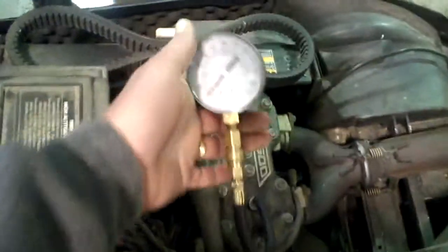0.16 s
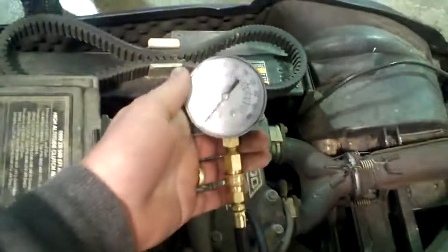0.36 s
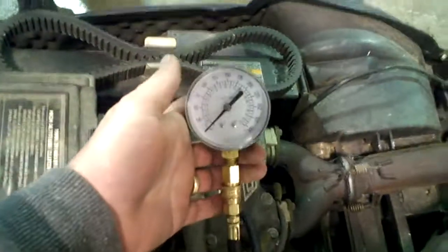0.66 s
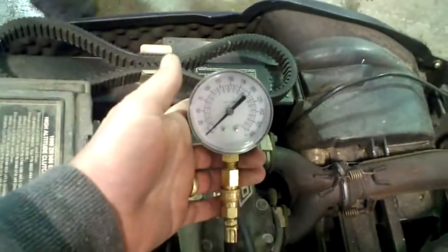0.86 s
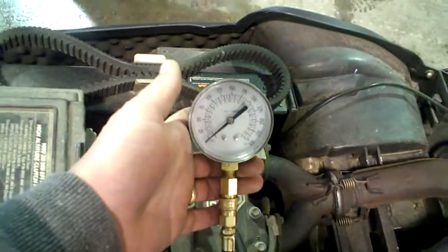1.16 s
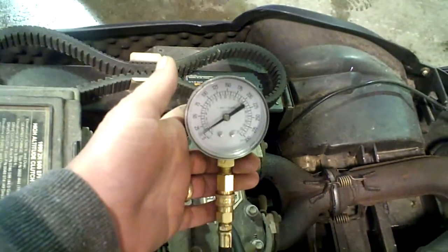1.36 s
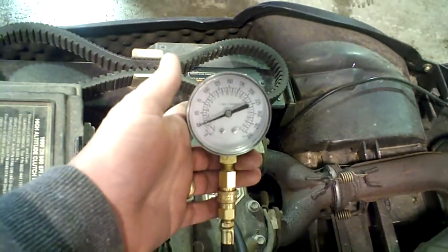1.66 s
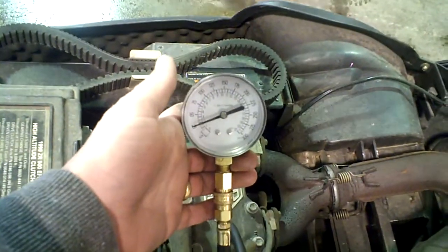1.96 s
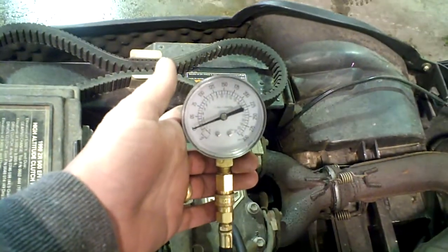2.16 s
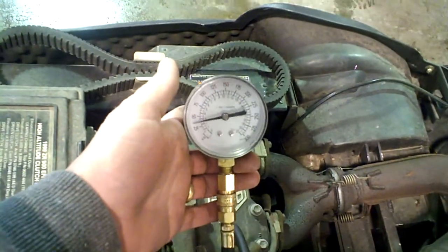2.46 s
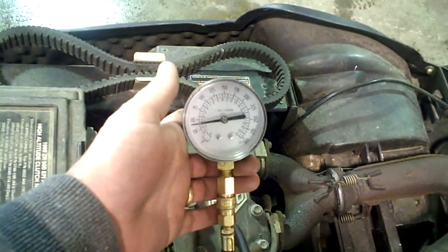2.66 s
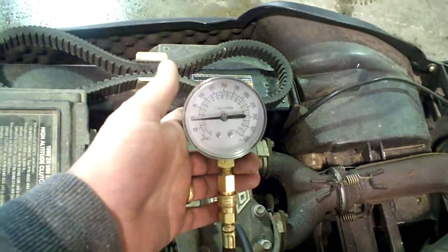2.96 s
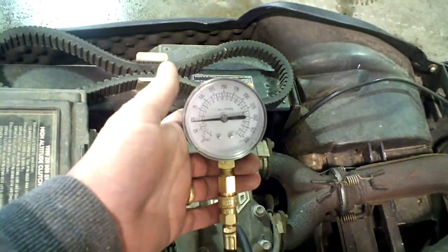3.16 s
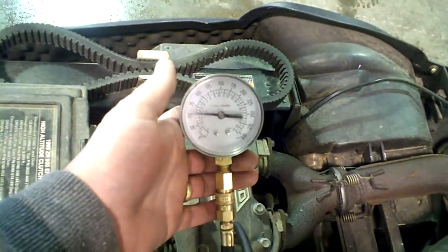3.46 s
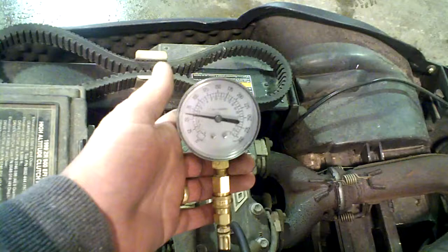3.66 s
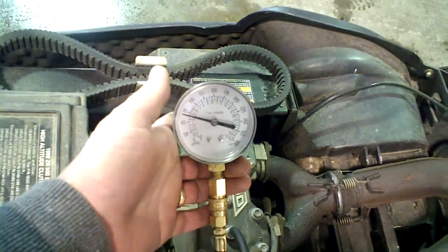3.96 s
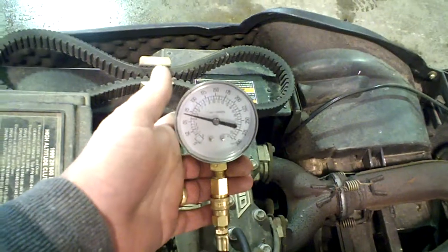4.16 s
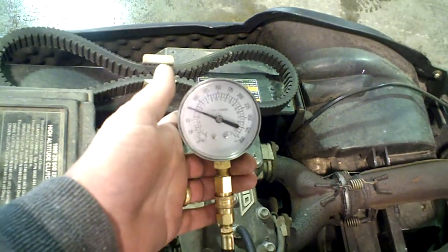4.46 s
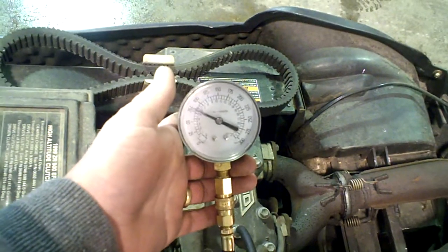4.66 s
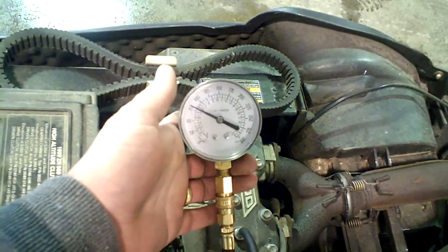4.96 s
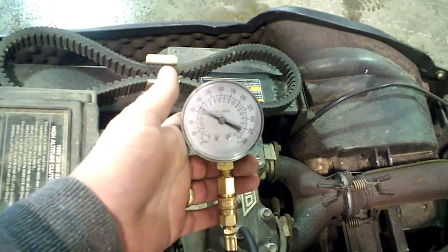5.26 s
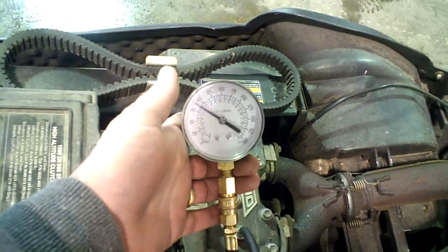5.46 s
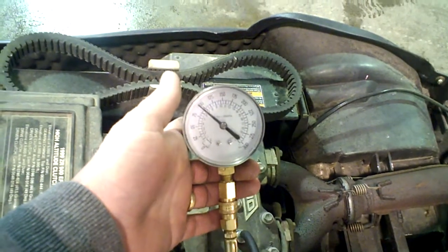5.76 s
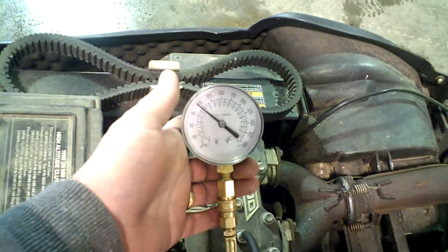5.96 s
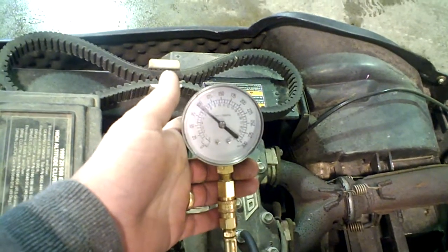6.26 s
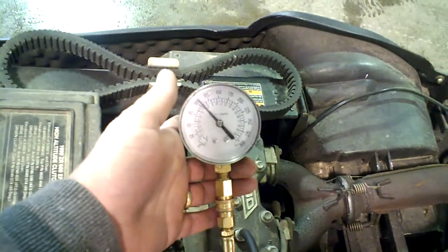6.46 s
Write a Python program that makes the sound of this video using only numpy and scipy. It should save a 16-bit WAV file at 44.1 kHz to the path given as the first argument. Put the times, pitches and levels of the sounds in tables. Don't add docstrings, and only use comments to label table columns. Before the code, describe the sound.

Six short starter pulls about a second apart, each a clunk, rapid airy pops slowing down and a metallic click, in a workshop.

```python
import sys
import numpy as np
from scipy import signal
from scipy.io import wavfile
from scipy.ndimage import uniform_filter1d

SR = 44100
rng = np.random.default_rng(int(sys.argv[2]) if len(sys.argv) > 2 else 0)


def pcm_store(signal):
    levels = np.round(np.clip(np.atleast_2d(signal), -1, 1) * 32767)
    wavfile.write(sys.argv[1], SR, levels.astype(np.int16).T)


def boost(x):
    u = np.asarray(x, float) / 20
    return 10 ** u


N = 291456
T = np.arange(N) / SR

# cord taut in seconds, strength in dB, first pop in dB, suddenness of start [ratio].
PULLS = [
    (1.14, 1.2, -9, 2.3),
    (2.27, 0.86, -11, 1.1),
    (3.31, -0.14, -27.5, 1.03),
    (4.34, -0.45, -22, 0.98),
    (5.35, -0.5, -18.5, 1.05),
    (6.36, -0.5, -17.5, 1),
]
TIGHT_POP_TIMES = [(1.231, 1.3127, 1.3922, 1.4853, 1.6068), (2.3041, 2.3863, 2.4669, 2.5623, 2.689),
                   (3.3053, 3.3963, 3.4776, 3.5713, 3.6961), (4.3303, 4.4217, 4.5049, 4.603, 4.7389),
                   (5.3545, 5.4441, 5.5257, 5.6209, 5.7491), (6.3639, 6.4534, 6.5341, 6.629, 6.757)]
# first pop in seconds, last pop in seconds.
OTHER_POP_SPANS = [(1.1813, 1.6868), (2.2541, 2.7724), (3.2555, 3.7807), (4.2862, 4.8336), (5.2951, 5.8365),
                   (6.3022, 6.844)]
# start in seconds, level in dB.
NUDGE = (1.1149, -17.4)
SHORTEST_TURN_S, OTHER_PHASE = .082, .49
# level at top speed in dB, loss per halving of speed in dB, dB per dB of pull strength.
TIGHT_POP = (-5, 4.4, 1.05)
OTHER_POP = (-11.5, 8.8, 1.7)
# crank angle in turns, lead in seconds.
PORT_TIMES = [(-.18, .009), (.29, .013), (.49, .0143)]
# level in dB, loss per halving of speed in dB, dB per dB of pull strength,
# low end in dB, low end gained per halving in dB.
PORT_AIR = [(-15, 1, 2, -10, 7), (-27.5, 10.5, 1.5, -7, 14), (-19.5, 9.5, 0.7, -10.5, 11)]
FIRST_SPIT_DB = -9
# frequency in Hz, level in dB.
DUCT = [(509, 0), (1028, -17), (800, -22), (290, -21)]
# frequency in Hz, width in Hz, level in dB.
CRANKCASE = [(144, 7.1, 0.5), (220, 43, -8)]
# frequency in Hz, width in Hz, level in dB.
JET = [(4560, 260, 0), (5290, 300, -3), (3850, 400, -7), (6600, 1200, -6)]
# frequency in Hz, width in Hz, level in dB.
LIP = [(6840, 1180, 24), (11500, 2000, -28)]
# start in seconds, peak level in dB, low end in dB.
TICKS = [(.341, -44, 9.5), (.377, -39.5, 14), (.397, -29, -22), (.517, -41, -2), (.609, -55, -4),
         (.6564, -61, -14.5), (.6914, -59, -2.5), (.7597, -62, -6), (.839, -48, 6), (.9986, -43, 4),
         (1.077, -35, -22), (1.3986, -23, 4), (1.8061, -19, -0.5), (1.897, -35, -14), (1.9144, -37, -8),
         (2.0328, -53, -19), (2.466, -23, -2), (2.875, -48, 10), (2.904, -47, 2), (3.05, -52, -4),
         (3.5235, -21, -6), (3.905, -38, 13), (4.0023, -52, -2.2), (4.2512, -45, -4), (4.7023, -19, -18),
         (4.9217, -52, 18), (5.1048, -57, 9), (5.8691, -43, 1.2), (6.311, -38, -4)]
# scrape in seconds, level in dB, bite in seconds, level in dB,
# rise of the bite in seconds.
PAWLS = [(2.087, -39.5, 2.105, -7, .004), (3.117, -25.5, 3.147, -5, .0066),
         (4.147, -25.5, 4.176, -5, .0034), (5.170, -22.5, 5.191, -7, .0017),
         (6.172, -24.5, 6.196, -8, .0017)]
# rise in seconds (negative is instant), t60 in seconds, high modes in dB, crack in dB.
SCRAPE = (-0.2, 0.5, 8, -19)
# t60 in seconds, high modes in dB, crack in dB.
BITE = (0.083, -3.5, -19.5)
# level in dB against the knock, low end in dB.
SCRAPE_SPIT = (-9.5, 10.6)
BITE_SPIT = (-14.5, 4.6)
# low, middle and high rings in dB against the knock.
SCRAPE_PING = (-19, -20, -15.5)
BITE_PING = (-40, -37, -33.5)
# start in seconds, level in dB, t60 in seconds, high modes in dB,
# crack in dB.
HAND_KNOCKS = [(.203, -42, 0.076, -25, -35), (0.222, -36, 0.059, -31, -36), (.255, -34.5, 0.12, -12, -36),
               (.341, -40, 0.12, -2.2, -21), (.378, -33.5, .094, -23, -40), (.397, -16.5, 0.073, 2, -20),
               (1.077, -32, 0.098, -25, -17), (1.807, -26.5, 0.055, 5, -39), (3.108, -40, .12, 6, -6),
               (5.157, -46.5, .08, 14, -8), (4.136, -38, .09, 12, -22), (6.159, -38, .09, 12, -17)]
HAND_RISE_S = 0.0051
# frequency in Hz, width in Hz, level in dB.
HOUSING = [(332, 114, 3.5), (620, 190, 9), (737, 95, 9.5)]
# frequency in Hz, width in Hz, level in dB.
COVER = [(1076, 180, 1.5), (1427, 48, 16), (1780, 260, -2.5), (2070, 30, -27.5), (2470, 210, -4)]
# start in seconds, low ring in dB, middle ring in dB, high rings in dB.
CUP_STRIKES = [
    (.398, -58, -55, -41),
    (1.345, -37, -40, -38),
    (1.4, -29.5, -31.5, -29.5),
    (2.468, -25, -42, -28.5),
    (3.53, -32, -38, -31),
    (4.503, -46, -48, -44),
    (4.537, -33, -35, -33),
    (5.532, -31, -48, -37),
    (5.56, -32, -38, -33),
    (6.545, -34, -37, -35),
]
# frequency in Hz, level in dB, t60 in seconds, strike level used [0 low, 1, 2].
CUP_MODES = [(3712, 2.5, .19, 0), (6220, .5, .22, 1), (7770, -1, .11, 2), (7892, 1, .08, 2),
             (8670, -1, .07, 2), (9850, -9, .05, 2), (11600, -6, .04, 2), (13680, -15, .04, 2)]
# start in seconds, level in dB.
THUDS = [
    (.222, -59),
    (.4, -38),
]
# start in seconds, level in dB, t60 in seconds.
BUMPS = [
    (.205, -50, 0.063),
    (.221, -44.5, 0.057),
    (.256, -42.5, 0.081),
]
# frequency in Hz, width in Hz, level in dB.
COWL = [(990, 140, 3), (1230, 96, 4), (2250, 140, -11), (600, 180, -5)]
# frequency in Hz, level in dB per Hz.
RUMBLE = [(24, -66), (40, -16), (86, -59), (129, -10), (217, -10.5), (252, -11.5), (304, -6.5), (377, -15),
          (420, 1), (550, -19.5), (920, -120)]
# frequency in Hz, level in dB per Hz.
RATTLE = [(150, -49), (250, -15), (289, -0.5), (360, -1.5), (518, -11), (611, 0), (1270, -6.5), (1420, -2),
          (1680, -11), (3000, -25.5), (3900, -22.5), (6600, -120)]
# frequency in Hz, level in dB per Hz.
HISS = [(1180, -5.5), (2000, 3.5), (3370, -7), (4570, -8.5), (5680, -7.5), (7380, -11.5), (16000, -38)]
# frequency in Hz, width in Hz, level in dB.
PANELS = [(295, 25, -3), (525, 45, 0), (1430, 32, -1), (2125, 40, -13)]
# top speed in dB, rise in dB/s to taut cord, climb in dB/s to top speed,
# sag in dB/s, dying fall in dB/s, seconds the fall begins before the last pop.
SPIN_LAWS = [(-32, 152, -7, 20.6, 94, 0.047), (-25.5, 127, 28, 24.8, 53.6, 0.037),
             (-37, 230, 49, 24, 79, 0.25)]
# Rumble, rattle, hiss at rest in dB.
SPIN_REST_DB = (-82, -68, -69.5)
# Rumble, rattle, hiss jolted by the handle in dB.
JOLT_DB = (-58, -52.5, -73)
JOLT_FALL = (55, 35, 21)
JOLT_S, TOP_TURN = 0.36, 1.6
# frequency in Hz, t60 in seconds.
SHOP = [(100, 2), (500, 1.52), (1500, 2.05), (4000, 0.93), (9000, 0.37)]
# frequency in Hz, level in dB per Hz.
FLOOR = [(35, -65), (60, -43), (351, -11), (869, -14), (931, -11), (1070, -6), (1830, -6), (2980, -25),
         (3340, -9), (3760, -12), (15500, -42)]
FLOOR_DB = -65.5
# frequency in Hz, level in dB rms.
HUM = [(717, -74), (961, -71)]


def evened(x):
    return x / np.sqrt(np.mean(x ** 2) + 1e-20)


def read(points, hz):
    f, value = np.transpose(points)
    return np.interp(np.log(hz + 1), np.log(f + 1), value)


def add(mix, s, sound):
    part = mix[round(s * SR):][:len(sound)]
    part += sound[:len(part)]


def resonate(x, modes):
    return sum(boost(db) * signal.lfilter(*signal.iirpeak(hz, hz / width, SR), x) for hz, width, db in modes)


def band(x, lo_hz, hi_hz):
    return evened(signal.sosfilt(signal.butter(2, [lo_hz, hi_hz], "band", fs=SR, output="sos"), x))


def burst(rise, hold, t60):
    t = np.arange(round(.15 * SR)) / SR
    attack = np.sin(np.pi / 2 * np.clip(t / rise, 0, 1)) ** 2
    return attack * boost(-60 * np.maximum(t - rise - hold, 0) / t60)


def noise(spectrum, patchy_db, grain_db):
    frames, hz = N // 256 + 5, np.fft.rfftfreq(1024, 1 / SR)
    roughness = evened(uniform_filter1d(rng.standard_normal(N), 90))
    grains = rng.standard_normal(N) * boost(grain_db * roughness)
    z = signal.stft(grains, nperseg=1024, noverlap=768)[2]
    patches = rng.standard_normal((frames, 513)).T[:, :z.shape[1]]
    patches = evened(uniform_filter1d(uniform_filter1d(patches, 8, 0), 5, 1))
    z = z * boost(read(spectrum, hz)[:, None] + patchy_db * patches)
    return evened(signal.istft(z, nperseg=1024, noverlap=768)[1][:N])


def strokes():
    pop_rows, spit_rows = [NUDGE], list(TICKS)
    turn = np.arange(5)
    for times, (first, last), (_, strength, first_db, _) in zip(TIGHT_POP_TIMES, OTHER_POP_SPANS, PULLS):
        angles = [OTHER_PHASE - 1, *turn, 4 + OTHER_PHASE]
        crank = np.polynomial.Polynomial.fit(angles, [first, *times, last], 6)
        half_turns = np.diff(crank(np.arange(11) / 2))
        slow = np.log2(half_turns * 2 / SHORTEST_TURN_S)
        after = slow[::2]
        around = (after + np.append(slow[1:-1:2], slow[-2])) / 2

        top_db, loss_db, share = TIGHT_POP
        pop_rows += zip(times, top_db - loss_db * after + share * strength)
        pop_rows.append((first, first_db))
        top_db, loss_db, share = OTHER_POP
        pop_rows += zip(crank(turn + OTHER_PHASE), top_db - loss_db * around + share * strength)

        spit_rows.append((first - PORT_TIMES[2][1], first_db + FIRST_SPIT_DB, 0))
        for (angle, lead), (db, loss_db, share, low_db, gain_db) in zip(PORT_TIMES, PORT_AIR):
            level_db = db - loss_db * after + share * strength
            spit_rows += zip(crank(turn + angle) - lead, level_db, low_db + gain_db * after)
    for scrape, scrape_db, bite, bite_db, rise in PAWLS:
        spit_rows.append((scrape, scrape_db + SCRAPE_SPIT[0], SCRAPE_SPIT[1]))
        spit_rows.append((bite + rise / 2, bite_db + BITE_SPIT[0], BITE_SPIT[1]))
    return sorted(pop_rows), spit_rows


def pops():
    out, t, rows = np.zeros(N), np.arange(-330, 400) / SR, strokes()[0]
    opens = np.clip((t + .0045) / .0042, 0, 1) ** .9
    shuts = np.clip((.0062 - t) / .0018, 0, 1) * boost(-1400 * np.maximum(t, 0))
    leak = 0.052 * signal.windows.hann(len(t)) ** 0.13 * (t < 0)
    opening = np.maximum(opens * shuts, leak)
    snap = boost(-27.5 - 60 * abs(t + 0.0039) / 0.028) * (t > -.004)
    for s, db in rows:
        detune, overtone = rng.standard_normal(2)
        ring = np.zeros(len(t))
        for k, (hz, mode_db) in enumerate(DUCT):
            level = boost(mode_db + (k > 0) * 2.56 * overtone)
            ring += level * np.cos(2 * np.pi * hz * (1 + 0.0036 * detune) * t)
        slap = snap * band(rng.standard_normal(len(t)), 4400, 8900)
        add(out, s + t[0], boost(db - 0.93) * (opening * ring + slap))
    echo = np.zeros(900)
    echo[[0, 412, 800]] = 1, .22, .1
    shove = abs(out) - uniform_filter1d(abs(out), size=300)
    return signal.oaconvolve(out, echo)[:N] + resonate(shove, CRANKCASE)


def spits():
    lip, core, low = np.zeros((3, N))
    shape = burst(0.0013, 0.0028, 0.024) + 0.15 * burst(0.0041, 0.008, 0.072)
    for s, db, low_db in strokes()[1]:
        add(lip, s, boost(db - 17.5) * burst(0.0005, 0.0032, 0.038))
        add(core, s + 0.00071, boost(db - 12.5) * shape)
        add(low, s + 0.00092, boost(db - 11.5 + low_db) * shape)
    a, b, c = rng.standard_normal((N, 3)).T
    jet = band(resonate(a, JET), 3420, 5670) * core
    dull_edge = band(b, 1420, 3250) * low
    crack = band(resonate(c, LIP), 2500, 14700) * lip
    return jet + dull_edge + crack


def knocks():
    rows = [(s, db, HAND_RISE_S, *rest) for s, db, *rest in HAND_KNOCKS]
    for scrape, scrape_db, bite, bite_db, rise in PAWLS:
        rows += [(scrape, scrape_db, *SCRAPE), (bite, bite_db, rise, *BITE)]
    return rows


def clunks():
    out = np.zeros(N)
    for s, db, rise, t60, high_db, crack_db in knocks():
        shape = burst(max(rise, .001), 0.0056, t60)
        blows = shape * rng.standard_normal(len(shape))
        body = evened(resonate(blows, HOUSING)) + boost(high_db) * evened(resonate(blows, COVER))
        contact = band(rng.standard_normal(len(shape)), 3300, 9600)
        crack = burst(0.00027, 0.0096, 0.54 * t60) * contact
        add(out, s, boost(db - 16.5) * (band(body, 330, 2480) + boost(crack_db + 14) * crack))
    return out


def strikes():
    rows = list(CUP_STRIKES)
    for scrape, scrape_db, bite, bite_db, rise in PAWLS:
        rows.append((scrape, *(scrape_db + np.array(SCRAPE_PING))))
        rows.append((bite + rise / 2, *(bite_db + np.array(BITE_PING))))
    return rows


def pings():
    out, t = np.zeros(N), np.arange(SR // 3) / SR
    fade = boost(-60 * t[:1500] / .05)
    for s, *levels_db in strikes():
        for hz, db, t60, column in CUP_MODES:
            chatter = fade * rng.standard_normal(1500) * (rng.random(1500) < .01)
            mode = boost(-60 * t / t60) * np.sin(2 * np.pi * hz * t)
            ring = signal.oaconvolve(mode, chatter)
            add(out, s, boost(levels_db[round(column)] + db) * ring / abs(ring).max())
    return out


def thuds():
    out = np.zeros(N)
    for s, db in THUDS:
        shape = burst(0.0035, 0.012, 0.14)
        blow = shape * rng.standard_normal(len(shape))
        add(out, s, boost(db) * evened(resonate(resonate(blow, HOUSING[:1]), HOUSING[:1])))
    return out


def bumps():
    out = np.zeros(N)
    for s, db, t60 in BUMPS:
        shape = burst(0.0013, 0.0075, t60)
        scuff = shape * rng.standard_normal(len(shape))
        add(out, s, boost(db - 12) * evened(resonate(scuff, COWL)))
    return out


def throb(depth_db, s, sag_s):
    since = T - s[np.maximum(np.searchsorted(s, T) - 1, 0)]
    kick = np.where(since > 0, np.exp(-abs(since) / sag_s), 0)
    return boost(depth_db * uniform_filter1d(kick, size=100))


def spin_gain(law, rest_db, jolt_db, jolt_fall):
    top_db, rise, climb, sag, fall, early = law
    gain = boost(rest_db) + (T > JOLT_S) * boost(jolt_db - jolt_fall * abs(T - JOLT_S))
    for times, (_, last), (taut, strength, _, sudden) in zip(TIGHT_POP_TIMES, OTHER_POP_SPANS, PULLS):
        top_s = np.interp(TOP_TURN, range(len(times)), times)
        knots = np.array([taut - 1, taut, top_s, last - early, last + 2])
        steps_db = np.diff(knots) * [rise * sudden, climb, -sag, -fall]
        db = np.append(0, np.cumsum(steps_db)) - steps_db[:2].sum()
        gain = gain + boost(top_db + strength + np.interp(T, knots, db))
    return gain


def spin():
    pop_s, spit_s = (np.sort(np.transpose(rows)[0]) for rows in strokes())
    rumble = throb(6.0, pop_s - .012, 0.015) * noise(RUMBLE, 1.3, 2.8)
    rattle = noise(RATTLE, 2.7, 2.5)
    panels = evened(resonate(noise([(100, 0), (3000, 0)], 0.9, 6.0), PANELS))
    rattle = throb(4.14, pop_s - .006, 0.012) * evened(rattle + boost(-4.5) * panels)
    hiss = throb(9, spit_s, .014) * noise(HISS, 2.2, 3)
    gains = [spin_gain(*rule) for rule in zip(SPIN_LAWS, SPIN_REST_DB, JOLT_DB, JOLT_FALL)]
    return gains[0] * rumble + gains[1] * rattle + gains[2] * hiss


def shop(x):
    taps = np.zeros(SR)
    at = np.arange(500, SR - 20, 20)
    taps[at + rng.integers(0, 20, len(at))] = rng.choice([-1., 1.], len(at))
    hz, t, z = signal.stft(taps, SR, nperseg=256)
    decay = boost(-60 * t / read(SHOP, hz)[:, None])
    tail = signal.istft(z * decay, SR, nperseg=256)[1]
    return signal.fftconvolve(x, tail / np.linalg.norm(tail))[:N]


def floor():
    hum = sum(boost(db) * np.sqrt(2) * np.sin(2 * np.pi * hz * T) for hz, db in HUM)
    return boost(FLOOR_DB) * noise(FLOOR, 1.3, .6) + hum


def scene():
    hits = pops() + spits() + clunks() + thuds() + pings() + bumps()
    return (hits + boost(-20.0) * shop(hits) + spin() + floor())[None]


def band_limit(x):
    return signal.sosfilt(signal.butter(12, 16990, fs=SR, output="sos"), x)


def record(dry):
    full = 1.2 * np.tanh(dry / 1.2)
    thin = signal.sosfilt(signal.butter(3, 85, "high", fs=SR, output="sos"), full)
    edge = signal.firwin(255, 15900, window=("kaiser", 5), fs=SR)
    mix = signal.oaconvolve(thin, edge[None], "same")
    return band_limit(mix)


dry = scene()
out = record(dry)
pcm_store(out)
```